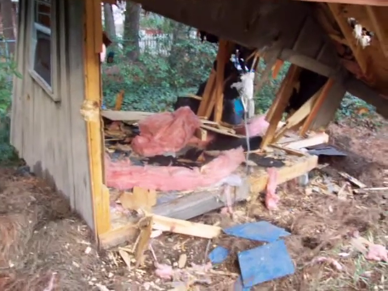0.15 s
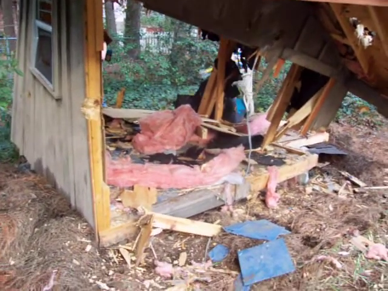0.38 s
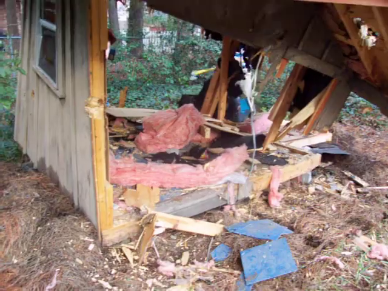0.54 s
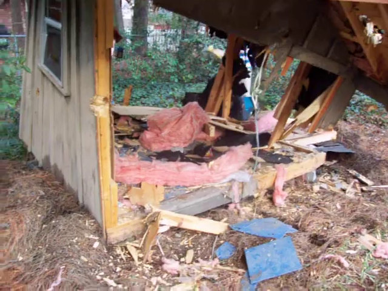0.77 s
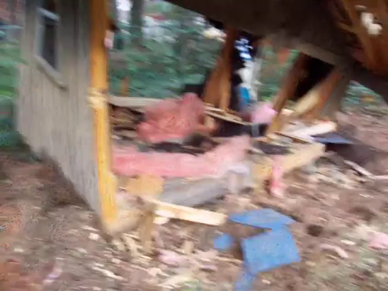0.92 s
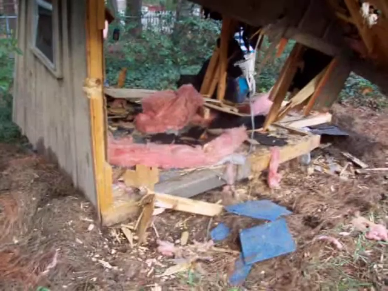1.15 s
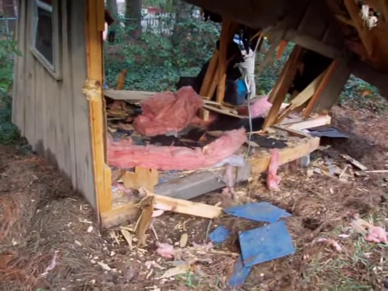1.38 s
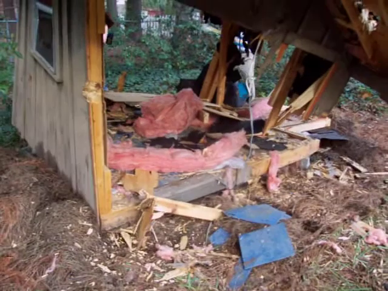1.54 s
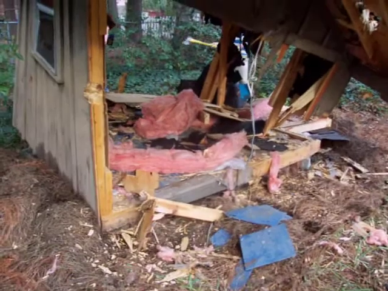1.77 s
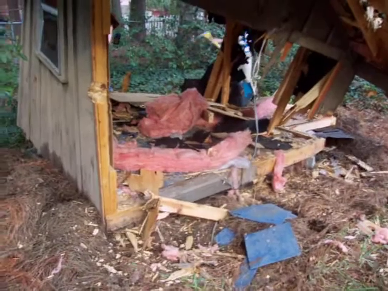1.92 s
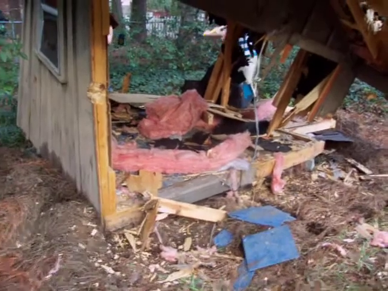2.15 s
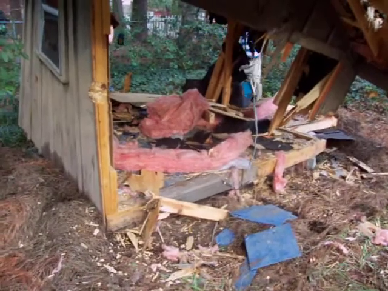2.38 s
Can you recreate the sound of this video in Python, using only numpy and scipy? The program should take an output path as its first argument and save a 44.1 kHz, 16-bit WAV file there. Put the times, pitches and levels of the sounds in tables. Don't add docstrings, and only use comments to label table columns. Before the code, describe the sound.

Sharp wooden strikes crack a building frame twice, echoing off walls while splinters and a board drop

```python
import sys
import numpy as np
from scipy import signal
from scipy.fft import rfft, irfft
from scipy.io import wavfile
from scipy.ndimage import uniform_filter1d

SR = 44100
rng = np.random.default_rng(int(sys.argv[2]) if len(sys.argv) > 2 else 0)


def makeup_ratio(level_db):
    decades = np.asarray(level_db, float) / 20
    return 10 ** decades


def wav_record(signal):
    frames = np.transpose(np.atleast_2d(signal))
    bounded = np.clip(frames, -1, 1)
    quanta = np.round(bounded * 32767).astype(np.int16)
    wavfile.write(sys.argv[1], SR, quanta)


N = 105840

# (time [s], strength [dB], push pitch [Hz], bounce delay [s], bounce level [dB])
BLOWS = [
    (.2185, 15, 150, .013, -13),
    (1.3285, 15, 190, .018, -15),
]


def evened(x):
    return x / np.sqrt(np.mean(x ** 2) + 1e-20)


def read(points, hz):
    f, value = np.transpose(points)
    return np.interp(np.log(hz + 1), np.log(f + 1), value)


def add(mix, s, sound):
    part = mix[round(s * SR):][:len(sound)]
    part += sound[:len(part)]


def colour(x, points):
    hz = np.fft.rfftfreq(len(x), 1 / SR)
    return evened(irfft(rfft(x) * makeup_ratio(read(points, hz)), len(x)))


def resonate(x, hz, width):
    r = np.exp(-np.pi * width / SR)
    pole = r * np.exp(2j * np.pi * hz / SR)
    return 2 * signal.lfilter([1 - r], [1, -pole], x + 0j).real


def fade(t, t60, rise=.0005):
    t = np.maximum(t, 0)
    return np.minimum(t / rise, 1) * makeup_ratio(-60 * t / t60)


def patchy(shape, bins, frames):
    rough = uniform_filter1d(rng.standard_normal(shape), size=bins, axis=0)
    return evened(uniform_filter1d(rough, size=frames, axis=1))


def blow(s, db, push_hz, bounce_s, bounce_db):
    # (frequency [Hz], level per Hz [dB])
    crack_spectrum = [(60, -18), (280, -4), (560, -10), (950, -1), (1350, -12), (2500, -5), (6000, -12),
                      (8000, -18)]
    # (frequency [Hz], width [Hz], level [dB])
    timber = [(350, 110, -4), (780, 70, 0), (1010, 90, -2), (2080, 120, -10), (2780, 110, -13),
              (3870, 90, -16), (4370, 90, -18), (5940, 140, -18)]
    touch_s = .003
    crack_rise_s, crack_t60, ring_t60, push_t60 = .004, .04, .085, .025
    crack_db, ring_db, push_db, graze_db = 0, -3.5, -2, -37
    n = 8192
    t = np.arange(n) / SR - touch_s
    noise = rng.standard_normal((3, n))

    shape = fade(t, crack_t60, crack_rise_s)
    shape += makeup_ratio(bounce_db) * fade(t - bounce_s, crack_t60 / 2)
    crack = colour(noise[0], crack_spectrum) * shape

    strike = noise[1] * fade(t, ring_t60, crack_rise_s)
    ring = sum(makeup_ratio(d) * evened(resonate(strike, f, w)) for f, w, d in timber)
    ring *= np.std(shape) / np.std(ring)

    push = -np.sin(2 * np.pi * push_hz * (t - .001)) * fade(t - .001, push_t60)

    graze = evened(resonate(noise[2], 3600, 1500))
    graze *= np.clip(1 + t / touch_s, 0, 1) * fade(t + touch_s, .06)

    hit = makeup_ratio(crack_db) * crack + makeup_ratio(ring_db) * ring + makeup_ratio(push_db) * push + makeup_ratio(graze_db) * graze
    return s - touch_s, makeup_ratio(db) * hit


def rollback(db, echo_s, early_db, sway_s, sway_db):
    # (frequency [Hz], level per Hz [dB])
    tail_spectrum = [(25, -10), (110, 0), (420, -10), (950, -2), (1350, -11), (2300, -6), (6300, -19.5),
                     (8000, -30)]
    # (frequency [Hz], t60 [s])
    tail_t60 = [(60, .6), (300, .45), (900, .68), (2200, .49), (6000, .44)]
    # (frequency [Hz], width [Hz], level [dB])
    tail_peaks = [(930, 140, -4), (1520, 90, -18), (1920, 80, -14), (2290, 70, -14)]
    scatter_db, lumps_db = 2.2, 1.5
    forest_db, forest_t60 = -27, 2.3
    sway_hz, sway_width_s = 50, .05
    n = 65536
    t = np.arange(n) / SR

    taps = rng.standard_normal(n) * makeup_ratio(scatter_db * rng.exponential(1, n))
    taps = colour(taps, tail_spectrum) + sum(makeup_ratio(d) * evened(resonate(taps, f, w)) for f, w, d in tail_peaks)

    hz, at, z = signal.stft(evened(taps), SR, nperseg=512)
    walls = makeup_ratio(-60 * at / read(tail_t60, hz)[:, None])
    forest = makeup_ratio(forest_db - 60 * at / forest_t60)
    z = z * makeup_ratio(lumps_db * patchy(z.shape, 30, 2)) * (walls + forest)
    tail = signal.istft(z, SR, nperseg=512)[1][:n]
    before_echo = np.clip((echo_s - t) / .004, 0, 1)
    tail *= np.minimum(t / .01, 1) * makeup_ratio(early_db * before_echo)

    sway = np.sin(2 * np.pi * sway_hz * t) * np.exp(-((t - sway_s) / sway_width_s) ** 2)
    return makeup_ratio(db) * tail + makeup_ratio(sway_db) * sway


def tick(db, hz):
    click_q, click_t60, snap_t60, snap_db, trim_db = 9, .045, .018, 1, -3.5
    n = 1024
    t = np.arange(n) / SR
    noise = rng.standard_normal(n)
    snap = evened(resonate(resonate(noise, 5500, 3000), 5500, 4000)) * fade(t, snap_t60) * .4
    click = resonate(noise * fade(t, .01), hz, hz / click_q) * fade(t, click_t60)
    return makeup_ratio(db + trim_db) * (click / abs(click).max() + makeup_ratio(snap_db) * snap)


def splinters():
    # (time [s], peak level [dB], pitch [Hz])
    landings = [(0.0897, -36, 6750), (0.136, -26, 6300), (0.188, -26, 2780), (0.5746, -26, 5940),
                (0.628, -11, 4100), (0.7291, -27, 2510), (0.7571, -30, 2500), (0.803, -20, 3080),
                (0.9072, -15, 2570), (0.9387, -28, 2870), (0.9856, -30, 2500), (1.049, -35, 5510),
                (1.0968, -30, 5530), (1.1402, -23, 6380), (1.1921, -28, 6240), (1.5084, -18, 2520),
                (1.7164, -27, 2820), (1.8108, -28, 4170), (1.9005, -21, 5860), (1.9509, -30, 3040),
                (1.9923, -34, 6330), (2.1779, -36, 6280), (2.2766, -26, 5880), (2.318, -28, 6190),
                (2.35, -30, 6740), (2.37, -23, 5940)]
    out = np.zeros(N)
    for s, db, hz in landings:
        add(out, s + .0002, tick(db, hz))
    return out


def thuds():
    # (time [s], peak level [dB], pitch [Hz], t60 [s])
    drops = [
        (.6297, -9, 370, .03),
        (.6325, -4.5, 205, .036),
        (.6372, -19, 600, .03),
        (.8556, -22, 900, .06),
        (1.045, -27, 250, .05),
        (1.142, -30, 250, .04),
        (.803, -25, 800, .05),
        (1.951, -35, 3040, .045),
        (.8045, -33, 3080, .035),
        (.808, -35, 4300, .02),
    ]
    out = np.zeros(N)
    t = np.arange(4096) / SR
    for s, db, hz, t60 in drops:
        add(out, s, makeup_ratio(db) * np.sin(2 * np.pi * hz * t) * fade(t, t60, .002))
    return out


def grit():
    grains_per_s, level_db, spread_db = 120, -50, 4
    pitches = (2600, 4200, 6200)
    out = np.zeros(N)
    t = np.arange(4096) / SR
    for hz in pitches:
        size = makeup_ratio(spread_db * np.minimum(rng.exponential(1, N), 4))
        size *= rng.random(N) < grains_per_s / len(pitches) / SR
        ping = np.sin(2 * np.pi * hz * t) * fade(t, .006)
        out += makeup_ratio(level_db) * signal.oaconvolve(size, ping)[:N]
    return out


def wash():
    # (frequency [Hz], level per Hz [dB])
    wash_spectrum = [(25, -15), (70, -3), (250, -11), (560, -11), (950, -5.5), (1220, -23), (3670, -31),
                     (7800, -35)]
    # (time [s], level [dB])
    wash_level = [(0, 0), (1.3, 0), (2.4, 0)]
    air_db, hiss_db = -37.5, -53.5
    z = signal.stft(colour(rng.standard_normal(N), wash_spectrum), SR, nperseg=1024)[2]
    z = z * makeup_ratio(1.5 * patchy(z.shape, 10, 5))
    air = evened(signal.istft(z, SR, nperseg=1024)[1][:N])
    hiss = evened(resonate(rng.standard_normal(N), 6280, 700))
    level = np.interp(np.arange(N) / SR, *np.transpose(wash_level))
    return makeup_ratio(air_db + level) * air + makeup_ratio(hiss_db) * hiss


def whine():
    line_hz, field_hz, first_field_s, slip_s, level_db = 7867.13, 59.94, .0052, .0022, -44.5
    field = (np.arange(N) / SR - first_field_s) * field_hz
    turns = np.where(np.floor(field) % 2 == 0, .5, 1.)
    slip_hz = (field % 1 < slip_s * field_hz) * turns / slip_s
    return makeup_ratio(level_db) * np.sin(2 * np.pi * np.cumsum(line_hz - slip_hz) / SR)


def scene():
    # (tail level [dB], wall echo delay [s], gain before the echo [dB],
    # sway delay [s], sway level [dB])
    returns = [
        (1, .088, -7, .13, -16),
        (2, .092, -9, .12, -17),
    ]
    mix = splinters() + thuds() + grit() + wash() + whine()
    for hit, back in zip(BLOWS, returns):
        add(mix, *blow(*hit))
        add(mix, hit[0], rollback(*back))
    return mix[None]


def ducked(x):
    duck_db, attack_s, hold_s, recover_s = -12, .012, .09, .22
    since = np.arange(N) / SR - np.array(BLOWS)[:, :1]
    duck = np.clip(since / attack_s, 0, 1) * np.clip(1 - (since - hold_s) / recover_s, 0, 1)
    return x * makeup_ratio(duck_db * duck.max(0))


def mirrored(x):
    z, hz = rfft(x), np.fft.rfftfreq(len(x), 1 / SR)
    half = round(16000 / 2 * len(x) / SR)
    z[half:2 * half + 1] = np.conj(z[half::-1])
    z[2 * half + 1:] = 0
    z *= makeup_ratio(-.019 * np.maximum(hz - 7760, 0) - .05 * np.maximum(hz - 8500, 0))
    return irfft(z, len(x))


def band_limit(x):
    return signal.sosfilt(signal.butter(12, 16490, fs=SR, output="sos"), x)


def record(dry):
    clip, pad = .71, 4410
    x = np.clip(ducked(dry[0]), -clip, clip)
    x = np.pad(x, pad, "reflect") * signal.windows.tukey(N + 2 * pad, pad / N)
    x = np.clip(mirrored(x), -clip, clip)
    below_top = np.fft.rfftfreq(len(x), 1 / SR) < 16000
    x = irfft(rfft(x) * below_top, len(x))
    return band_limit(x[None, pad:-pad])


dry = scene()
out = record(dry)
wav_record(out)
```